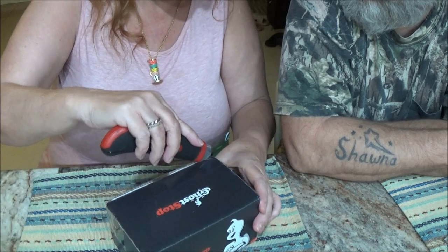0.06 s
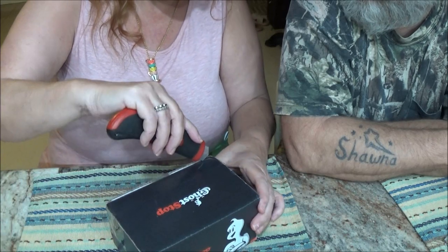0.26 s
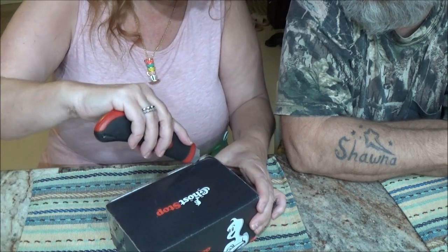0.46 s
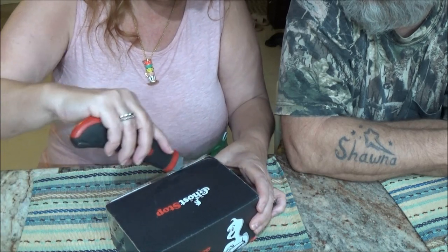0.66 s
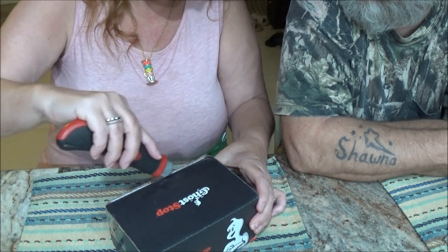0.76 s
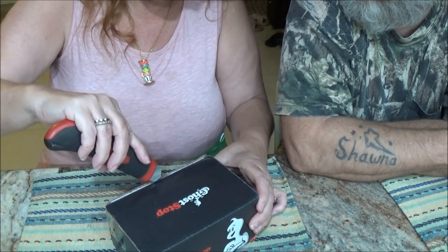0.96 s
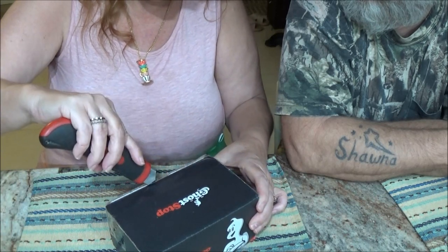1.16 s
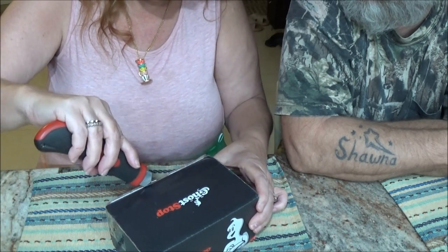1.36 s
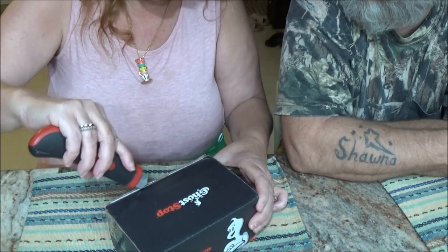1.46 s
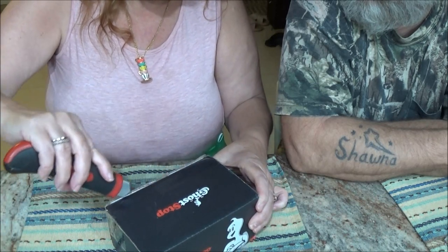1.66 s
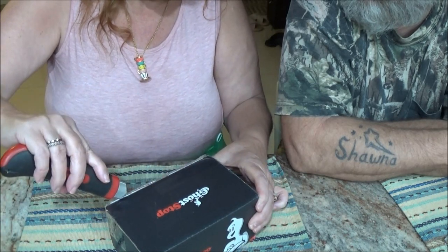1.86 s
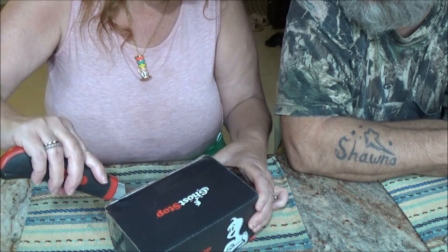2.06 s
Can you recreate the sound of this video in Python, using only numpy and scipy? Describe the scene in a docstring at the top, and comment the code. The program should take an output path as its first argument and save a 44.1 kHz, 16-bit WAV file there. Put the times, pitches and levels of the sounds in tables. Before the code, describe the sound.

A utility knife cuts packing tape on a cardboard box: a few sharp handling clicks, then five short raspy, hissing strokes with brief rips and crackles, dull box bumps, close stereo microphone in a lightly reverberant kitchen.

```python
"""Knife slitting a taped box

A utility knife is drawn through the packing tape of a cardboard box in five strokes, close by in a kitchen.
Stick-slip friction, as random grains over a smooth rub, excites the hollow box, its lid and the bright tape.
The tape gives way in short rips, and fibres crackle where the cut is deepest. The blade clicks as it is set
down and snags, the box bumps on the table, and the room adds reflections, a tail and faint steady noise."""
import sys
import numpy as np
from scipy import signal
from scipy.fft import rfft, irfft, next_fast_len
from scipy.io import wavfile
from scipy.ndimage import map_coordinates

SR = 44100
rng = np.random.default_rng(int(sys.argv[2]) if len(sys.argv) > 2 else 0)


def output_pcm(signal):
    """Save a mono or channel-first signal as 16-bit PCM at the path in sys.argv[1].

    Samples are clipped to [-1, 1] before scaling.
    """
    pcm = np.clip(np.atleast_2d(signal).T, -1, 1) * 32767
    wavfile.write(sys.argv[1], SR, np.round(pcm).astype(np.int16))


N = 92610  # length in samples


def amp(db):
    """Logarithmic level: decibels to amplitude gain."""
    return 10 ** (np.asarray(db) / 20)


def unit(x):
    """Normalisation: x at rms 1."""
    return x / np.sqrt(np.mean(x ** 2) + 1e-20)


def along(points, hz):
    """Interpolation: (frequency, value) points read on a logarithmic frequency axis."""
    f, v = np.transpose(points)
    return np.interp(np.log(hz + 1), np.log(np.abs(f) + 1), v)


def fade(t, t60):
    """Exponential damping: amplitude falls by 60 dB in t60 seconds."""
    return np.exp(-np.log(1000) * t / t60)


def wobble(rate):
    """Slow random modulation: a smooth curve through rate random knots a second."""
    return map_coordinates(rng.standard_normal(N // 8), [np.arange(N) * rate / SR], mode="wrap")


def response(points, peaks=(), size=4096):
    """Minimum phase: a causal impulse response of energy 1, a broad colour with resonances on top."""
    hz = np.fft.rfftfreq(size, 1 / SR)
    db = along(points, hz)
    for f, width, lift in peaks:
        db = db + lift / (1 + (2 * (hz - f) / width) ** 2)
    # folding the cepstrum onto positive times makes the response causal
    cepstrum = irfft(np.log(amp(db)))
    cepstrum[1:size // 2] *= 2
    cepstrum[size // 2 + 1:] = 0
    h = irfft(np.exp(rfft(cepstrum)))
    return h / np.linalg.norm(h)


def through(x, points, peaks=()):
    """Source and filter: x sounded through a coloured body by convolution."""
    return signal.fftconvolve(x, response(points, peaks))[:len(x)]


def add(track, s, x):
    """Superposition: mix x into the track at time s."""
    part = track[max(round(s * SR), 0):][:len(x)]
    part += x[:len(part)]


# Colour of the still room: pitch_hz [Hz], relative_db [dB]
AIR_COLOUR = [(30, -16), (80, -3), (160, 0), (300, 4.5), (480, 1), (800, 5.5), (1500, -2.5), (2200, -8),
              (4000, -4), (6000, -9), (9000, -7), (12000, -11.5), (15800, -13.5)]
# Two soft bands in its hiss: pitch_hz [Hz], width_hz [Hz], lift_db [dB]
AIR_BANDS = [(2870, 1100, 11.5), (9800, 620, 9)]
AIR_DB = -53  # rms in each channel
AIR_ALIKE = 0.76  # correlation of left and right


def air():
    """Partly diffuse field: steady faint noise as a common and an opposed component."""
    mid, side = [unit(through(x, AIR_COLOUR, AIR_BANDS)) for x in rng.standard_normal((2, N))]
    turn = np.arccos(np.clip(AIR_ALIKE, 0, 1)) / 2
    return amp(AIR_DB) * (np.cos(turn) * mid + np.sin(turn) * np.array([side, -side]))


# Reverberation of the kitchen: pitch_hz [Hz], t60_s [s]
ROOM_DECAY = [(200, 0.31), (2000, 1), (8000, 0.18), (15000, 0.28)]
# Colour of the sound sent into the room: pitch_hz [Hz], relative_db [dB]
ROOM_TINT = [(100, -6), (280, -15), (500, -5), (1000, 4), (2000, -4.5), (5000, 4.5), (9000, 3.5),
             (12000, -23), (15000, -35)]
ROOM_DB, WALLS_DB = -16.5, -43  # tail and early reflections


def kitchen(x):
    """Reverberation: early reflections from table and walls and a short tail, different at each microphone."""
    noise = rng.standard_normal((2, SR // 2))
    hz, t, z = signal.stft(noise, SR, nperseg=256)
    decay = fade(t, along(ROOM_DECAY, hz)[:, None])
    tail = signal.istft(z * decay, SR, nperseg=256)[1]
    walls = np.zeros_like(tail)
    for side in walls:
        arrivals = rng.integers(0, SR // 50, size=10)  # within 20 ms
        side[arrivals] = rng.standard_normal(size=10)
    answer = amp(ROOM_DB) * tail / np.linalg.norm(tail[0])
    answer = answer + amp(WALLS_DB) * walls / np.linalg.norm(walls, axis=1, keepdims=True)
    delayed = np.pad(through(x, ROOM_TINT), (SR // 500, 0))  # by 2 ms
    return signal.fftconvolve(delayed[None], answer, axes=1)[:, :N]


# Bumps of the box, peak before the high-pass: start_s [s], level_db [dB], pitch_hz [Hz], t60_s [s]
BOX_BUMPS = [(.022, -45, 520, 0.017), (0.12, -32, 218, 0.029), (0.243, -35.5, 330, 0.023),
             (0.2778, -33.5, 466, .03), (.309, -37.5, 490, .035), (0.417, -30.5, 260, 0.047),
             (0.829, -27.5, 214, 0.041), (0.862, -28, 207, 0.061), (0.901, -35.5, 236, 0.043),
             (1.128, -32, 206, 0.028), (1.706, -29, 245, .035), (1.787, -22, 283, 0.023),
             (1.795, -25, 330, 0.077), (2.0487, -36.5, 486, 0.11)]
# Modes of each bump: pitch_ratio [times pitch_hz], relative_db [dB], t60_ratio [times t60_s]
THUD_MODES = [(.72, -10.5, 1.06), (1, 4, 0.81), (1.4, -7, 1.15), (2.1, -10, 0.76), (3.1, -7, 0.26)]
BUMP_ATTACK_S = 0.00088  # time constant
BUMP_CUT_HZ = 202  # the small box radiates little below this


def bumps():
    """Modal vibration: the shifting box gives a dull, quickly damped thud of five modes."""
    out, t = np.zeros(N), np.arange(SR // 6) / SR
    attack = 1 - np.exp(-t / BUMP_ATTACK_S)
    for s, db, hz, t60 in BOX_BUMPS:
        thud = np.zeros_like(t)
        for ratio, level, life in THUD_MODES:
            thud += amp(level) * np.sin(2 * np.pi * hz * ratio * t) * fade(t, t60 * life)
        thud *= attack
        add(out, s, amp(db) * thud / np.abs(thud).max())
    return signal.sosfilt(signal.butter(4, BUMP_CUT_HZ, "high", fs=SR, output="sos"), out)


# Clicks of blade and handle, peak before the trim CLICK_DB; knock and rattle relative:
# start_s [s], level_db [dB], centre_hz [Hz], width [octaves], knock_db [dB], rattle_db [dB]
KNIFE_CLICKS = [(0.021, -28.5, 9000, 0.32, -11, -1), (0.1033, -17, 9800, 1, -13, 1),
                (.1131, -19.5, 8850, 0.63, -4, -14), (0.233, -22, 7000, 0.56, -1, -2.5),
                (.2404, -1, 7800, 0.55, -7, -12), (0.2771, -15.5, 6950, 0.86, -7, -2),
                (0.2768, -18, 3500, .28, -6, -8), (0.4018, -15, 7900, 0.41, -3, -7),
                (0.6515, -17.5, 7050, 0.31, 1, -1), (0.7032, -8.5, 4400, 0.53, -14, -7),
                (0.731, -4, 8000, 1.3, -26, -7), (0.8554, -5.5, 9500, 0.43, -31, -24),
                (0.828, -9.5, 3600, 0.81, -14.5, -2), (1.0743, -15, 9700, .35, -22, -12),
                (1.131, -14.5, 3800, 0.66, -4, -10), (1.7764, -20, 8000, .8, -16, 1),
                (1.7861, -8, 9800, 0.32, -10, 0.5), (2.005, -40, 2800, 0.2, -17, 4),
                (2.0723, -38.5, 2880, 0.17, -22, -4)]
# Steel colour shared by all clicks: pitch_hz [Hz], relative_db [dB]
STEEL_COLOUR = [(60, -16), (400, 21), (1500, 0), (11000, 3.5), (12500, 0), (14000, -7), (16000, -23)]
# Resonances of blade and handle: pitch_hz [Hz], width_hz [Hz], lift_db [dB]
KNIFE_MODES = [(3500, 800, 2.5), (4670, 580, -3.5), (7270, 940, 3.5), (9400, 600, 2.5)]
# Colour of the lid under a click: pitch_hz [Hz], relative_db [dB]
KNOCK_COLOUR = [(80, -53), (300, -3), (900, -18), (1350, 2), (1850, 7), (2500, -11.5), (3500, -6.5),
                (6000, -8), (12000, -19.5)]
CLICK_DB, SNAP_SHARE = -0.5, 0.48  # trim; share of the scatter
SNAP_T60_S, RATTLE_T60_S, KNOCK_T60_S = 0.00063, 0.085, 0.014


def clicks():
    """Impact excitation: a hard contact and its scatter, a blade rattling in its holder, a knock on the lid."""
    out, t = np.zeros(N), np.arange(SR // 10) / SR
    grid_hz = np.geomspace(50, SR / 2, 60)
    steel_db = along(STEEL_COLOUR, grid_hz)
    contact = t == 0
    decays = fade(t, np.array([[SNAP_T60_S], [RATTLE_T60_S], [KNOCK_T60_S]]))
    decays = decays * (1 - np.exp(-t / 0.000092))  # brief onset
    for s, db, hz, octaves, knock_db, rattle_db in KNIFE_CLICKS:
        bursts = rng.standard_normal(decays.shape) * decays
        snap, rattle, knock = [x / np.linalg.norm(x) for x in bursts]
        band_db = -20 * np.log10(1 + (np.log2(grid_hz / hz) / octaves) ** 2)
        colour = np.column_stack([grid_hz, steel_db + band_db])
        strike = contact + SNAP_SHARE * snap + amp(rattle_db) * rattle
        steel = unit(through(strike, colour, KNIFE_MODES))
        click = steel + amp(knock_db) * unit(through(knock, KNOCK_COLOUR))
        add(out, s, amp(db + CLICK_DB) * click / np.abs(click).max())
    return out


SLIPS_PER_S, SLIP_SPREAD_DB, RUB_SHARE = 8000, 1.5, 0.63  # grains and the smooth rub beneath them
JUDDER_PER_S, JUDDER_DB = 130, 0.82


def slips():
    """Stick-slip friction: force on the blade at rms 1, irregular slips of random size over a smooth rub."""
    spread = np.minimum(rng.exponential(size=N), 5)
    sizes = amp(SLIP_SPREAD_DB * spread) * rng.choice([-1, 1], N)
    grains = unit(sizes * (rng.random(N) < SLIPS_PER_S / SR))
    judder = amp(JUDDER_DB * wobble(JUDDER_PER_S))
    return unit((grains + RUB_SHARE * rng.standard_normal(N)) * judder)


PATCH_HZ, PATCH_S = 398, .012  # size of the shifts of colour as the blade travels


def patchy(x, depth_db):
    """Time-varying spectrum: the colour of x shifts from moment to moment, each band on its own."""
    hz, t, z = signal.stft(x, SR, nperseg=256)
    places = np.meshgrid(hz / PATCH_HZ, t / PATCH_S, indexing="ij")
    field = map_coordinates(rng.standard_normal((128, 512)), places, mode="wrap")
    return unit(signal.istft(z * amp(depth_db * field), SR, nperseg=256)[1][:N])


SLIT_FROM_S, SLIT_BY_S = 0.59, 1.16  # the tape loses its tension as the slit grows
END_FROM_S, END_BY_S = 1.55, 1.745  # the blade reaches the stiff end of the lid


def travelling(x, taut, slit, end):
    """Moving excitation: x crossfades through three (colour, resonances) bodies along the seam."""
    t = np.arange(N) / SR
    opened = np.clip((t - SLIT_FROM_S) / (SLIT_BY_S - SLIT_FROM_S), 0, 1)
    ended = np.clip((t - END_FROM_S) / (END_BY_S - END_FROM_S), 0, 1)
    at_start = through(x * (1 - opened), *taut)
    at_slit = through(x * opened * (1 - ended), *slit)
    return at_start + at_slit + through(x * ended, *end)


DRIFT_S, DRIFT_PER_S = .0006, 9  # depth and pace of the delay


def drifting(x):
    """Delay modulation: resonances waver slightly as the blade travels and the pressure changes."""
    return map_coordinates(x, [np.arange(N) + SR * DRIFT_S * wobble(DRIFT_PER_S)], order=5)


# Colour of the hollow: pitch_hz [Hz], relative_db [dB]
HOLLOW_COLOUR = [(60, -43), (110, -31), (180, -8.5), (260, -10.5), (330, -3), (560, -1.5), (850, -5),
                 (1150, -10), (2000, -23.5)]
# Resonances of the hollow, and of the hollow cut at its end: pitch_hz [Hz], width_hz [Hz], lift_db [dB]
BOX_MODES = [(312, 26, 5.5), (359, 12, 3.5), (483, 26, 10), (600, 72, 8), (728, 40, 3), (1068, 36, 9.5)]
BOX_END_MODES = [(312, 40, 12.5), (366, 25, 8), (477, 47, 4.5), (595, 26, 7.5), (1020, 54, 0)]
HOLLOW_DB = 0.5


def box_hollow(force, level):
    """Cavity resonance: the slips excite the hollow box."""
    early = (HOLLOW_COLOUR, BOX_MODES)
    return travelling(force * level * amp(HOLLOW_DB), early, early, (HOLLOW_COLOUR, BOX_END_MODES))


# Colour of the lid: pitch_hz [Hz], relative_db [dB]
RASP_COLOUR = [(500, -45.5), (850, -6.5), (1100, -3), (1400, -1), (1900, -1), (2600, -4), (3300, -3.5),
               (4200, -26), (7000, -44.5)]
# Lid still taped down, slit open, and cut at its end: pitch_hz [Hz], width_hz [Hz], lift_db [dB]
LID_TAUT_MODES = [(1060, 87, 10), (1208, 27, 13), (1730, 49, 10), (1838, 87, 14), (1996, 62, 4),
                  (2350, 670, 9.5), (3260, 55, 2.5)]
LID_SLIT_MODES = [(1010, 63, 5.5), (1350, 70, -7), (1742, 73, 9), (1796, 123, 11.5), (2340, 130, 9.5),
                  (3110, 400, 6)]
LID_END_MODES = [(1058, 39, 6), (1555, 130, 6), (1770, 130, 4), (2230, 130, 6), (3150, 120, 8)]
RASP_DB, RIP_RASP_DB, LID_PATCH_DB = 0, -13, 2
LID_JUDDER_PER_S, LID_JUDDER_DB = 70, 1  # the blade catches unevenly on the cardboard


def lid_rasp(level, rips):
    """Plate vibration: separate uneven slips rasp on the lid, with the power of the rips added."""
    judder = amp(LID_JUDDER_DB * wobble(LID_JUDDER_PER_S))
    strength = np.hypot(level * amp(RASP_DB), rips * amp(RIP_RASP_DB))
    scrape = patchy(slips() * judder, LID_PATCH_DB) * strength
    return travelling(scrape, (RASP_COLOUR, LID_TAUT_MODES), (RASP_COLOUR, LID_SLIT_MODES),
                      (RASP_COLOUR, LID_END_MODES))


# Fibres snapping under the blade: pitch_hz [Hz], relative_db [dB]
CRACKLE_COLOUR = [(1200, -20), (2400, -7), (3300, 1), (4400, -2), (5500, -10), (9000, -16), (15000, -39)]
CRACKLE_PER_S, CRACKLE_DB, CRACKLE_SPREAD_DB = 390, -5, 4.5  # level relative to the lid's rasp
DEEP_CUT_S, DEEP_CUT_LENGTH_S = 0.923, 0.1  # centre and standard deviation of the deepest bite


def crackle(rasp):
    """Random impulses: single fibres snap while the blade is deep in the cardboard."""
    t = np.arange(N) / SR
    sizes = amp(CRACKLE_SPREAD_DB * rng.standard_normal(N)) * rng.choice([-1, 1], N)
    snaps = sizes * (rng.random(N) < CRACKLE_PER_S / SR)
    depth = np.exp(-((t - DEEP_CUT_S) / DEEP_CUT_LENGTH_S) ** 2 / 2)
    return amp(CRACKLE_DB) * rasp * depth * unit(through(snaps, CRACKLE_COLOUR))


# Tape under tension, slit, and the last of it: pitch_hz [Hz], relative_db [dB]
TAUT_TAPE_COLOUR = [(1800, -33), (3500, -9), (4800, -9), (5400, -7), (6100, 5), (6900, -2.5), (7800, 2.5),
                    (8900, -3), (9900, -0.5), (11000, -9), (12300, -10.5), (13800, -22), (15800, -22)]
SLIT_TAPE_COLOUR = [(1800, -31), (3500, -9.5), (4500, -8), (5300, -6.5), (6200, -0.5), (8300, -2),
                    (9600, 1), (10600, -9), (12300, -7), (13500, -22), (15800, -28)]
END_TAPE_COLOUR = [(1800, -32), (3500, -8.5), (4400, -5.5), (5100, -5.5), (6200, -1.5), (8000, -4.5),
                   (8950, 0.5), (9700, -3.5), (10500, -7), (12500, -12), (14000, -22), (15800, -24)]
# Resonances of the blade, for hiss and rips: pitch_hz [Hz], width_hz [Hz], lift_db [dB]
BLADE_MODES = [(4400, 69, 6.9), (4695, 98, 12.2), (6480, 130, 3.5), (7560, 35, 4), (7930, 45, 10.4),
               (8140, 50, 3)]
HISS_DB, HISS_JUDDER_DB, TAPE_PATCH_DB = -1, 1.27, 2


def tape_hiss(force, level):
    """Membrane and blade resonance: the slips hiss in the tape, with fewer blade modes towards the end."""
    judder = amp(HISS_JUDDER_DB * wobble(JUDDER_PER_S))
    tear = patchy(force * judder, TAPE_PATCH_DB) * level * amp(HISS_DB)
    return travelling(tear, (TAUT_TAPE_COLOUR, BLADE_MODES), (SLIT_TAPE_COLOUR, BLADE_MODES[:3]),
                      (END_TAPE_COLOUR, BLADE_MODES[:1]))


# Rips of the tape: start_s [s], length_s [s], level_db [dB]
TAPE_RIPS = [(0.366, 0.011, -39.5), (0.394, 0.0044, -34), (0.411, 0.0096, -33.5), (0.47, 0.046, -37.5),
             (0.718, 0.012, -22.5), (0.746, 0.0039, -13), (0.7498, 0.0045, -17.5), (.767, 0.0045, -25),
             (0.771, 0.0076, -37), (0.7782, 0.011, -18.5), (0.806, 0.0106, -27.5), (0.8206, 0.0087, -19),
             (0.844, 0.0023, -27), (0.857, 0.0028, -20.5), (0.865, 0.0025, -21), (0.884, 0.013, -26.5),
             (0.964, 0.011, -37.5), (1.123, 0.016, -41), (1.602, 0.015, -34.5), (1.701, 0.039, -31),
             (1.723, 0.013, -29), (1.755, .008, -28)]
RIP_ATTACK_S, RIP_STOP_S = 0.00094, 0.00061  # linear rise; time constant of the stop


def ripping():
    """Sudden release: each rip starts abruptly, holds while the tape runs and stops short; powers add."""
    t = np.arange(N) / SR
    power = np.zeros(N)
    for s, length, db in TAPE_RIPS:
        rise = np.clip((t - s) / RIP_ATTACK_S, 0, 1)
        stop = np.exp(-np.maximum(t - s - length, 0) / RIP_STOP_S)
        power += (amp(db) * rise * stop) ** 2
    return np.sqrt(power)


# Colour of a rip: pitch_hz [Hz], relative_db [dB]
RIP_COLOUR = [(1800, -29.5), (3400, -15.5), (4400, -1.5), (5400, -15.5), (6400, 5.5), (7000, -1.5),
              (7800, 5), (8600, -2), (10300, -5.5), (12000, -9), (13500, -20.5), (15800, -21)]


def tape_rip(rips):
    """Forced resonance: slips at the strength of the rips ring the blade."""
    early = (RIP_COLOUR, BLADE_MODES)
    return travelling(slips() * rips, early, early, (END_TAPE_COLOUR, BLADE_MODES[:1]))


# The five strokes, levels before the layer trims:
# start_s [s], hollow_level_db [dB], rasp_level_db [dB], hiss_level_db [dB]
FIRST_STROKE = [(0.29, -56, -43.5, -44), (0.312, -43, -49.5, -50), (0.332, -59, -51, -51),
                (0.356, -50, -56, -52), (0.372, -48, -39, -37), (0.388, -47, -49, -48),
                (0.398, -44.5, -40.5, -46), (0.424, -38.5, -39, -32.5), (0.526, -42, -39, -29),
                (0.54, -40, -46, -37.5), (0.564, -44.5, -45, -41), (0.578, -60, -51, -58)]
SECOND_STROKE = [(0.6, -51.5, -53, -44.5), (0.638, -47.5, -47, -42.5), (0.66, -36, -33.5, -26),
                 (0.7, -42, -35.5, -29), (0.716, -32.5, -36, -24.5), (0.738, -36, -30, -23),
                 (0.762, -34.5, -29.5, -29.5), (0.798, -37, -33.5, -28.5), (0.838, -36.5, -32, -28.5),
                 (0.86, -30.5, -33.5, -26.5), (0.971, -39, -31.5, -31.5), (0.979, -38, -47, -41)]
THIRD_STROKE = [(0.99, -38.5, -39, -42), (1.006, -40, -35.5, -33.5), (1.05, -30, -31.5, -30.5),
                (1.068, -37.5, -38, -37), (1.14, -36.5, -32.5, -32), (1.152, -47.5, -43.5, -44.5),
                (1.175, -41.5, -41, -42), (1.228, -39, -36, -36), (1.271, -39.5, -39.5, -35),
                (1.282, -52, -42, -52), (1.3, -44.5, -53, -54)]
FOURTH_STROKE = [(1.32, -53, -52, -47.5), (1.358, -48.5, -43.5, -40.5), (1.377, -41.5, -33, -32.5),
                 (1.41, -41.5, -41, -36.5), (1.444, -48.5, -46, -45), (1.485, -42.5, -40.5, -35),
                 (1.52, -51.5, -56, -54.5)]
FIFTH_STROKE = [(1.54, -53, -48.5, -45.5), (1.582, -39.5, -34.5, -33.5), (1.644, -34.5, -35, -30),
                (1.676, -45, -29.5, -29), (1.686, -37, -37, -39.5), (1.698, -33, -37, -32.5),
                (1.708, -38.5, -33, -31), (1.73, -33, -29, -31), (1.75, -33.5, -35, -33.5),
                (1.79, -34, -34, -28.5), (1.817, -37.5, -36, -34), (1.826, -36, -41.5, -37),
                (1.964, -56.5, -57, -56), (1.98, -59, -64.5, -56)]
# idle level at touch and at lift, which lies beyond the end of the sound; levels glide in between
TOUCH_S, LIFT_S, IDLE_DB = 0.14, 5.3, -71.5


def cutting():
    """Parallel bodies: one stick-slip force drives box and tape, separate slips the lid; rips, crackle add."""
    t = np.arange(N) / SR
    touch, lift = [TOUCH_S] + [IDLE_DB] * 3, [LIFT_S] + [IDLE_DB] * 3
    s, *levels = np.vstack([touch, FIRST_STROKE, SECOND_STROKE, THIRD_STROKE, FOURTH_STROKE,
                            FIFTH_STROKE, lift]).T
    hollow, rasp, hiss = [amp(np.interp(t, s, db)) for db in levels]
    force, rips = slips(), ripping()
    lid_and_tape = lid_rasp(rasp, rips) + tape_hiss(force, hiss)
    return box_hollow(force, hollow) + drifting(lid_and_tape) + tape_rip(rips) + crackle(rasp)


LEFT_DB = .25  # left raised and right lowered by this


def scene():
    """Direct and reverberant field: knife and box sit almost straight ahead of the microphones."""
    near = cutting() + clicks() + bumps()
    return near * amp([[LEFT_DB], [-LEFT_DB]]) + kitchen(near) + air()


TOP_HZ = 15800


def record(dry):
    """Band limitation: the recorder keeps nothing above its limit."""
    m = next_fast_len(N + SR // 4)
    kept = np.fft.rfftfreq(m, 1 / SR) < TOP_HZ
    return irfft(rfft(dry, m) * kept, m)[:, :N]


dry = scene()
out = record(dry)
output_pcm(out)
```